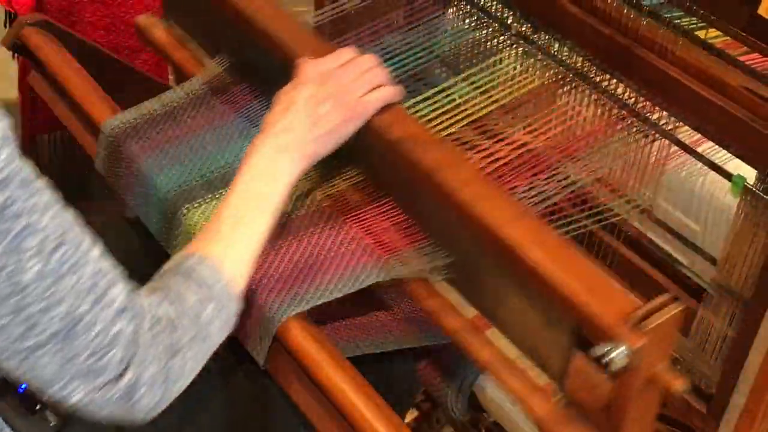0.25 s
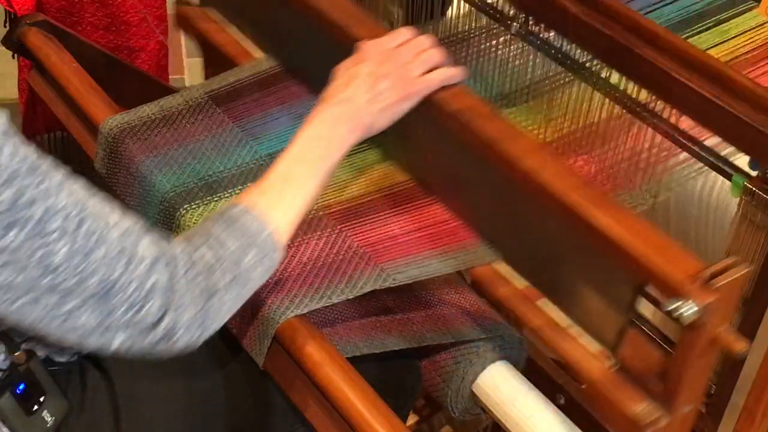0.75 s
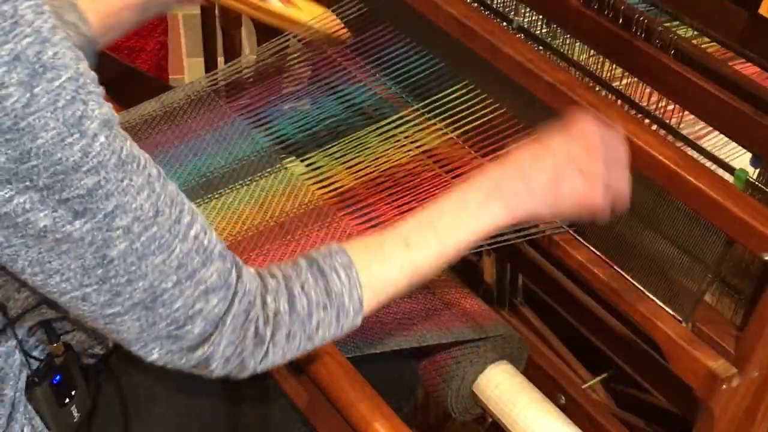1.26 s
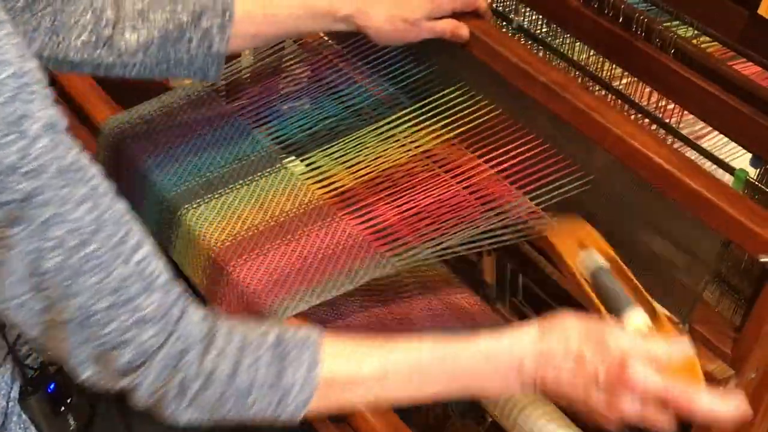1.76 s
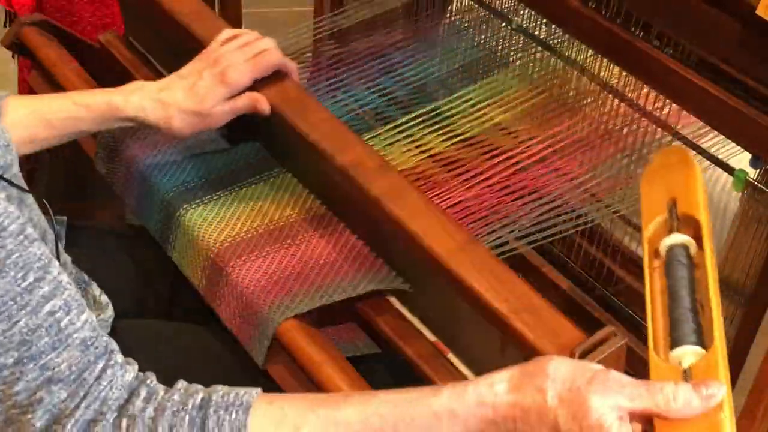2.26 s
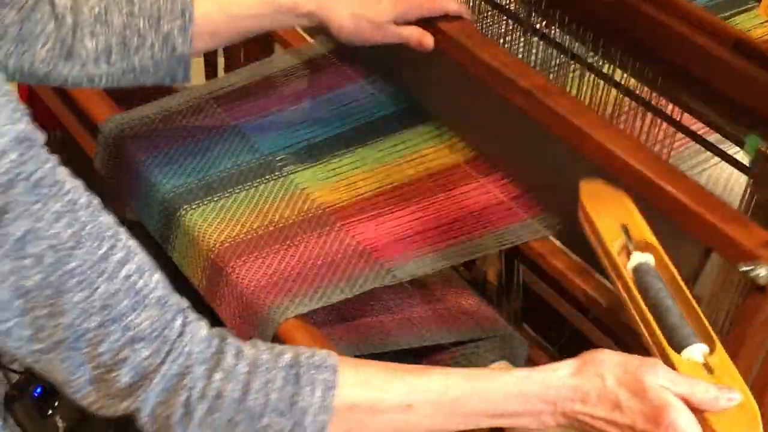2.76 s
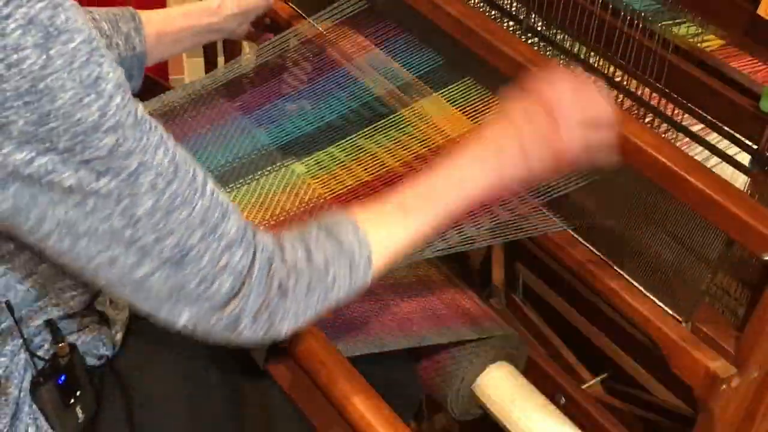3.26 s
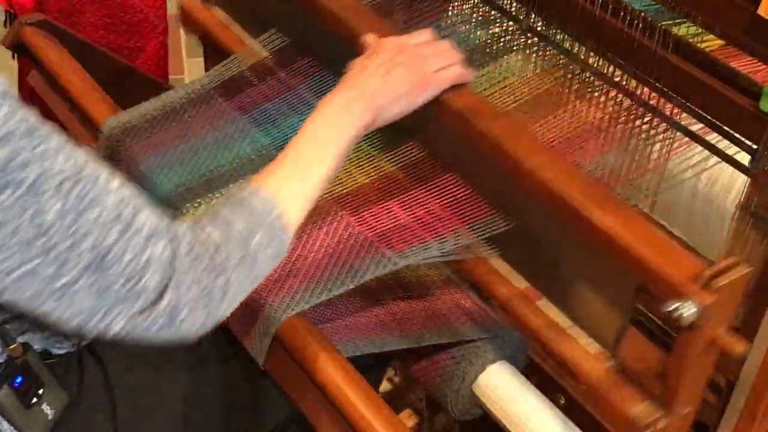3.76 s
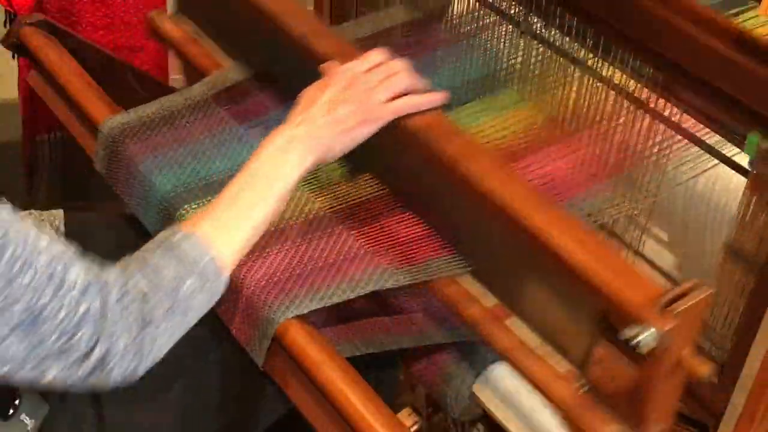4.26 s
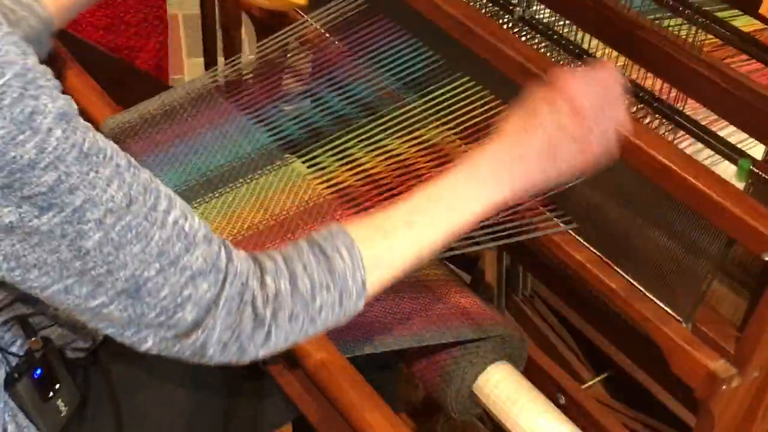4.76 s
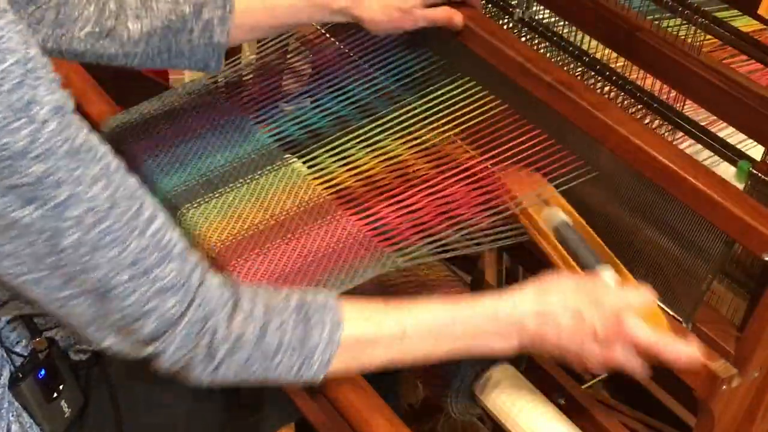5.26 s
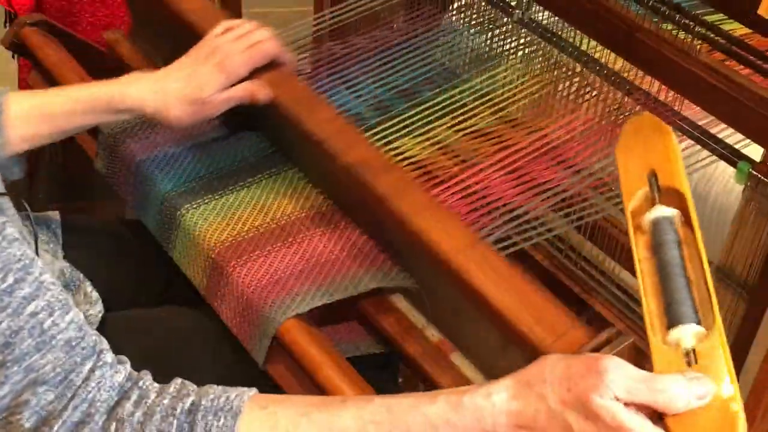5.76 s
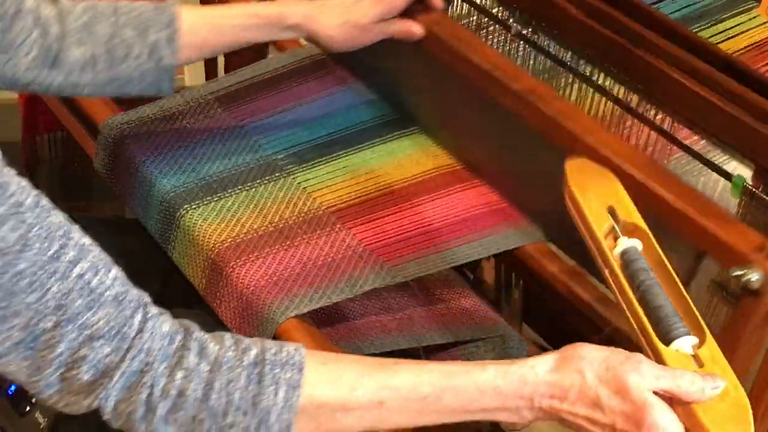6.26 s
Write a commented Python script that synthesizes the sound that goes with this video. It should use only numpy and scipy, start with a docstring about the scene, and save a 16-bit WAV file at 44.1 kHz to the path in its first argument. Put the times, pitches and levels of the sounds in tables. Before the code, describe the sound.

A wooden floor loom is worked by hand, heard from beside the weaver in a small room. It opens with a few bobbin clicks, then a loud clatter of metal heddles and a low thud at about 0.7 seconds, and wooden knocks at 1 and 1.3. The bobbin chatters in the thrown shuttle from 1.2 to 2 seconds, with a dull bump at 1.9. Faint creaks and another heddle clatter follow between 2.1 and 2.8, then a sharp knock at 2.9. The bobbin rattles again from 3.1 to 4.1, with a strong, close, dull bump at 3.4. Heddles clatter at 4.3, the beater knocks at 4.6, and the bobbin chatters from 4.8 to 5.4 and clicks near 5.9. Softer rattling, a knock and a low thud come around 6.4. Threads hiss softly through the reed, over a faint mains hum.

```python
"""A bobbin clicks and chatters on its spindle as a shuttle is thrown across a wooden floor loom.
The beater swings, creaks and knocks on the frame; at each change of shed the metal heddles clatter.
Low thuds sound now and then, warp threads hiss through the reed, and a few dull bumps come
close by. All is heard from beside the weaver, in a small room with a faint mains hum."""
import sys
import numpy as np
from scipy import signal
from scipy.fft import rfft, irfft, next_fast_len
from scipy.io import wavfile
from scipy.ndimage import uniform_filter1d

SR = 44100
rng = np.random.default_rng(int(sys.argv[2]) if len(sys.argv) > 2 else 0)


def store_pcm(level_fs):
    """Save levels as 16-bit WAV."""
    pcm = np.round(np.clip(level_fs, -1, 1) * 32767).astype(np.int16)
    wavfile.write(sys.argv[1], SR, np.atleast_2d(pcm).T)


N = 287576
STRIKE_S = 0.12  # buffer for one contact


def amp(db):
    """Decibels to gain."""
    return 10 ** (np.asarray(db) / 20)


def unit(x):
    """Scale to rms 1."""
    return x / np.sqrt(np.mean(x ** 2) + 1e-20)


def along(points, hz):
    """Interpolate (Hz, value) points on a log frequency axis."""
    point_hz, values = np.transpose(points)
    return np.interp(np.log(hz + 1), np.log(point_hz + 1), values)


def clock(length_s):
    """Sample times in seconds."""
    return np.arange(int(length_s * SR)) / SR


def add(track, time_s, sound):
    """Mix a sound into a track."""
    start = max(round(time_s * SR), 0)
    track[start:start + len(sound)] += sound[:max(N - start, 0)]


def filtered(x, gain):
    """Zero-phase filter with response gain(hz)."""
    size = next_fast_len(len(x) + 8192)
    return irfft(rfft(x, size) * gain(np.fft.rfftfreq(size, 1 / SR)), size)[:len(x)]


def shaped(x, spectrum):
    """Filter by (Hz, dB) points, then scale to rms 1."""
    return unit(filtered(x, lambda hz: amp(along(spectrum, hz))))


def causal(gain, size=2048):
    """Minimum-phase impulse response for gain(hz)."""
    magnitude = np.maximum(gain(np.fft.rfftfreq(size, 1 / SR)), 1e-6)
    cepstrum = irfft(np.log(magnitude))
    cepstrum[1:size // 2] *= 2
    cepstrum[size // 2 + 1:] = 0
    return irfft(np.exp(rfft(cepstrum)))


def convolved(x, response):
    """Convolution cut to the length of x."""
    return signal.fftconvolve(x, response)[:len(x)]


def gesture(t, rise_s, hold_s, sag_db_per_s, release_t60_s):
    """Envelope: attack, sagging hold, release."""
    release_db = 60 * np.maximum(t - hold_s, 0) / release_t60_s
    return (1 - np.exp(-t / rise_s)) * amp(-sag_db_per_s * t - release_db)


def ringing(modes, detune):
    """Damped modes; each blow lands elsewhere and rings them a little differently."""
    t = clock(STRIKE_S)
    out = np.zeros(len(t))
    for hz, db, t60_s in modes:
        strength, shift, polarity = rng.standard_normal(3)
        envelope = amp(db + 2 * strength - 60 * t / t60_s)
        out += np.sign(polarity) * envelope * np.sin(2 * np.pi * hz * (1 + detune * shift) * t)
    return out


def burst(t60_s):
    """Decaying noise: two hard surfaces chatter as they meet."""
    t = clock(STRIKE_S)
    return rng.standard_normal(len(t)) * amp(-60 * t / t60_s)


def impacts(size, rate_per_s, spread_db):
    """Tiny collisions of random time, sign and strength."""
    hits = rng.random(size) < rate_per_s / SR
    strength = np.clip(rng.standard_normal(size), -2, 2)
    return hits * rng.choice([-1, 1], size) * amp(spread_db * strength)


# room air: (frequency [Hz], relative density [dB])
AIR_SPECTRUM = [(20, -2), (60, 3.5), (120, 3.5), (300, -2.5), (700, -9.5), (2000, -4.5), (6000, -9.5),
                (16000, -14)]
def background(air_db=-63, hum_db=-72, mains_hz=60):
    """Still room air with a mains hum."""
    air = shaped(rng.standard_normal(N), AIR_SPECTRUM)
    hum = unit(np.sin(2 * np.pi * mains_hz * np.arange(N) / SR))
    return amp(air_db) * air + amp(hum_db) * hum


# room decay: (frequency [Hz], t60 [s])
ROOM_DECAY = [(150, 0.67), (1000, 0.49), (3000, 0.44), (8000, 0.33), (15000, 0.37)]
def room(x, build_s=0.0028, block=4096):
    """Reverberation, with a new tail per block as weaver and beater move."""
    out = np.zeros(N)
    for start in range(0, N, block):
        hz, t, noise = signal.stft(rng.standard_normal(SR // 2), SR, nperseg=256)
        fade = amp(-60 * t / along(ROOM_DECAY, hz)[:, None]) * (1 - np.exp(-t / build_s))
        tail = signal.istft(noise * fade, SR, nperseg=256)[1]
        add(out, start / SR, signal.fftconvolve(x[start:start + block], tail / np.linalg.norm(tail)))
    return out


# yarn hiss contour: (time [s], level [dB])
YARN_LEVELS = [(0.0, -58.5), (0.11, -57.5), (0.58, -56), (1.25, -58.5), (2.21, -52), (2.34, -56.5),
               (2.96, -47), (3.09, -57), (3.36, -62.5), (3.52, -60.5), (3.65, -59), (3.96, -57),
               (4.16, -53), (4.38, -54), (4.65, -55.5), (4.79, -54), (4.98, -55), (5.21, -72.5),
               (5.74, -57), (5.9, -55), (6.12, -56), (6.52, -48.5)]
# yarn hiss: (frequency [Hz], relative density [dB])
YARN_SPECTRUM = [(100, -11.5), (250, -7), (450, 0), (750, 4), (1100, -1), (1700, 0.5), (3300, -3.5),
                 (6700, -0.5), (10000, -11), (16000, -20)]
def yarn(trim_db=-1, pause_db=-6.5, pause_s=0.071, return_trim_db=-14, shed_db=-52):
    """Warp threads brush through the reed, swelling as the shed opens and the beater returns."""
    t = np.arange(N) / SR
    fibres = shaped(impacts(N, rate_per_s=4400, spread_db=1), YARN_SPECTRUM)
    # the hiss dips just before the beater moves or lands
    pauses = sum(np.exp(-((t - time_s + pause_s / 2) / pause_s) ** 2)
                 for pull_s, _, rest_s, _, _ in BEATER_SWINGS for time_s in (pull_s, rest_s))
    contour_db = np.interp(t, *np.transpose(YARN_LEVELS))
    rubbing = amp(trim_db + contour_db + pause_db * pauses)
    drag = gesture(clock(0.92), rise_s=0.082, hold_s=0.082, sag_db_per_s=0, release_t60_s=0.68)
    for _, _, rest_s, rest_db, _ in BEATER_SWINGS:
        add(rubbing, rest_s, amp(rest_db + return_trim_db) * drag)
    for _, _, land_s, _ in SHED_CHANGES:
        add(rubbing, land_s, amp(shed_db) * drag)
    return fibres * rubbing


# creaks: (time [s], length [s], start pitch [Hz], end pitch [Hz], level [dB], pitch jitter [ratio])
BEATER_CREAKS = [(2.153, 0.074, 693, 776, -59.5, 0), (2.457, 0.069, 721, 770, -54, 0),
                 (2.694, 0.069, 1430, 1504, -55, 0.04), (4.117, .095, 723, 915, -52, 0.02),
                 (6.043, 0.076, 734, 767, -54, 0.13)]
def beater_creaks():
    """A wooden pivot sticks and slips, singing briefly as it turns."""
    out = np.zeros(N)
    for time_s, length_s, start_hz, end_hz, db, jitter in BEATER_CREAKS:
        t = clock(length_s)
        slip, grip = unit(uniform_filter1d(rng.standard_normal((2, len(t))), size=120))
        pitch_hz = np.interp(t, [0, length_s], [start_hz, end_hz]) * (1 + jitter * slip)
        swell = np.sin(np.pi * t / length_s) * amp(3 * grip)
        tone = np.sin(2 * np.pi * np.cumsum(pitch_hz) / SR)
        add(out, time_s, amp(db) * unit(swell * tone))
    return out


# bumps: (time [s], peak [dB])
BUMP_HITS = [(1.879, -29), (2.035, -38), (3.357, -18.5)]
# bump modes: (frequency [Hz], relative level [dB], t60 [s])
BUMP_MODES = [(78.5, -5, 0.099), (175, 3, 0.018), (464, 17, 0.011), (825, 13, 0.0076), (1220, 13, 0.0047)]
def bumps(highpass_hz=70, rise_s=0.00011):
    """Soft, dull bumps close by: a few heavily damped modes."""
    out, t = np.zeros(N), clock(0.1)
    bump = sum(amp(db - 60 * t / t60_s) * np.sin(2 * np.pi * hz * t) for hz, db, t60_s in BUMP_MODES)
    bump *= 1 - np.exp(-t / rise_s)
    bump = signal.sosfilt(signal.butter(1, highpass_hz, "high", fs=SR, output="sos"), bump)
    for time_s, peak_db in BUMP_HITS:
        add(out, time_s, amp(peak_db) * bump / np.abs(bump).max())
    return out


# low thuds: (time [s], level [dB], t60 [s])
LOW_THUDS = [(.697, -41.5, 0.19), (1.024, -51, 0.18), (1.878, -48, 0.34), (2.17, -68, 0.34),
             (4.27, -57, 0.68), (4.661, -65, 0.26), (6.08, -54.5, 0.28), (6.43, -44.5, 0.44)]
# rumble: (frequency [Hz], relative density [dB])
RUMBLE_SPECTRUM = [(50, -30), (130, -7), (190, -5.5), (260, -4), (420, 6), (560, 3.5), (900, 6),
                   (2000, -40), (6000, -70)]
def low_thuds(rise_s=0.0047):
    """Low thuds and short rumbles of the loom and cloth being worked."""
    out, t = np.zeros(N), clock(0.4)
    for time_s, db, t60_s in LOW_THUDS:
        rumble = shaped(rng.standard_normal(len(t)), RUMBLE_SPECTRUM)
        envelope = (1 - np.exp(-t / rise_s)) * amp(db - 60 * t / t60_s)
        add(out, time_s, rumble * envelope)
    return out


# blows on the frame: (time [s], attack level [dB], tilt [dB/octave], t60 scale [ratio])
FRAME_KNOCKS = [(.146, -47, 0.5, 1), (.325, -40, 4.5, 1), (.633, -37.5, 6.5, 1), (1.016, -30.5, 1, 1),
                (1.323, -33, 5, 3), (1.434, -49, -2.5, 1), (2.918, -25.5, -1.5, .8),
                (2.936, -38.5, -2.5, 2.5), (3.946, -41, 4, 1.5), (4.356, -41, -5.5, 1.5),
                (4.545, -44.5, -1.5, 1.5), (4.642, -31, -0.5, 1.5), (6.048, -42, 1, 1),
                (6.377, -40.5, 3, 1)]
# frame modes: (frequency [Hz], relative level [dB], base t60 [s])
FRAME_MODES = [(441, -12.5, 0.049), (736, -12, 0.058), (924, -3, 0.015), (1185, -1, 0.024), (1611, 0, 0.03),
               (1747, 6.5, 0.014), (2187, 5, 0.016), (2620, 2, 0.015), (3360, -1.5, 0.061)]
def frame_knocks(attack_s=0.005):
    """Beater, treadles and shuttle strike the wooden frame, which rings on when left free."""
    out = np.zeros(N)
    wood_hz_db = [(250, -23.5), (600, -1.5), (950, 5.5), (2200, -1.5), (5000, -10.5), (14000, -33)]
    for time_s, db, tilt_db_per_oct, t60_scale in FRAME_KNOCKS:
        modes = [(hz, mode_db, t60_s * t60_scale) for hz, mode_db, t60_s in FRAME_MODES]
        blow = unit(ringing(modes, detune=0.012)) + 0.7 * unit(burst(t60_s=0.015))
        wood = causal(
            lambda hz: amp(along(wood_hz_db, hz) + tilt_db_per_oct * np.log2((hz + 100) / 1500)))
        knock = signal.fftconvolve(blow, wood)
        attack_rms = knock[:int(attack_s * SR)].std()
        add(out, time_s, amp(db) * knock / attack_rms)
    return out


# heddle rattle: (frequency [Hz], relative density [dB])
HEDDLE_SPECTRUM = [(60, -21), (150, -7.5), (280, -15), (450, -7), (800, 0), (1200, -2.5), (1900, 2),
                   (2700, 1), (3600, -3), (5200, 0), (7800, -2), (9000, -8), (11500, -12), (16000, -21)]
def rattle(db, rise_s, hold_s, tilt_db_per_oct):
    """Loose metal heddles collide while shaken, then settle; a harder shake makes more collisions."""
    def metal_gain(hz):
        octaves = np.log2(np.clip(hz, 600, 10000) / 2000)
        return amp(along(HEDDLE_SPECTRUM, hz) + tilt_db_per_oct * octaves)

    t = clock(0.4)
    group_rate_per_s = 400 * amp(0.7 * (db + 36))
    swarm = sum(convolved(impacts(len(t), group_rate_per_s, spread_db=1.5), burst(t60_s=0.004))
                for _ in range(4))
    envelope = gesture(t, rise_s, hold_s, sag_db_per_s=26.5, release_t60_s=0.097)
    return amp(db) * envelope * unit(convolved(swarm, causal(metal_gain)))


# beater swings: (pull time [s], level [dB], back-at-rest time [s], level [dB], rise at rest [s])
BEATER_SWINGS = [(.298, -42, 1.009, -32, .004), (2.137, -42, 2.818, -35, .012),
                 (3.907, -40.5, 4.633, -33.5, .009), (5.703, -41.5, 6.395, -35, .04)]
# shed changes: (start time [s], level [dB], end time [s], level [dB])
SHED_CHANGES = [(.653, -29.5, 0.69, -23), (2.407, -39, 2.47, -33), (4.243, -42.5, 4.357, -37),
                (6.074, -50, 6.228, -48)]
def heddles(jolt_rise_s=0.0061, travel_trim_db=-6):
    """Each pick shakes the heddles: the beater starts, the shed changes, the beater comes back."""
    out = np.zeros(N)
    for pull_s, pull_db, rest_s, rest_db, rise_s in BEATER_SWINGS:
        add(out, pull_s, rattle(pull_db, rise_s=0.019, hold_s=0.087, tilt_db_per_oct=0.5))
        add(out, rest_s, rattle(rest_db, rise_s, hold_s=rise_s + 0.075, tilt_db_per_oct=0.24))
    jolt = dict(rise_s=jolt_rise_s, hold_s=0.016, tilt_db_per_oct=1.6)
    for start_s, start_db, land_s, land_db in SHED_CHANGES:
        add(out, start_s, rattle(start_db, **jolt))
        travel = rattle(start_db + travel_trim_db, jolt_rise_s, land_s - start_s, tilt_db_per_oct=-0.1)
        add(out, start_s, travel)
        add(out, land_s, rattle(land_db, **jolt))
    return out


# tugs of the weft: (time [s], hold [s], relative level [dB])
BOBBIN_SPINS = [(0, 0.072, -46), (1.155, 0.11, -45), (1.633, 0.5, -47), (3.12, 0.17, -53),
                (3.313, 0.11, -45.5), (3.517, 0.41, -45.5), (4.802, 0.12, -42.5), (5.404, 0.15, -50),
                (5.88, 0.13, -53.5)]
# shuttle with bobbin: (frequency [Hz], relative level [dB], t60 [s])
SHUTTLE_MODES = [(1181, 1.5, 0.081), (1703, 14, 0.026), (2168, 9.5, 0.035), (2424, 11.5, 0.048),
                 (2604, 9.5, 0.035), (3055, 6.5, 0.011), (3410, 1, 0.035), (4057, 4, 0.058),
                 (4564, 3.5, 0.14), (4810, 5.5, 0.035), (5304, 6, 0.034), (6070, 3, 0.049),
                 (7350, -22, 0.019), (7994, 1, 0.041), (8140, 2, 0.04), (10650, -33, .015),
                 (12400, -13, 0.028)]
def bobbin_spin(trim_db=-2):
    """The unwinding bobbin chatters inside the shuttle and runs down after each tug."""
    taps = impacts(N, rate_per_s=120, spread_db=4.5)
    chatter = convolved(taps, ringing(SHUTTLE_MODES, detune=0.0044))
    chatter_hz_db = [(1000, -17), (2400, -2.5), (3500, -5), (8000, -16), (13000, -31)]
    spin = np.zeros(N)
    for time_s, hold_s, db in BOBBIN_SPINS:
        run_down = gesture(clock(1), rise_s=0.004, hold_s=hold_s, sag_db_per_s=41, release_t60_s=0.14)
        add(spin, time_s, amp(db + trim_db) * run_down)
    return shaped(chatter, chatter_hz_db) * spin


# spindle snaps: (time [s], relative level [dB])
SPINDLE_TICKS = [(.1281, -43.5), (1.4626, -36), (4.0357, -49), (5.8533, -38)]
# spindle modes: (frequency [Hz], relative level [dB], t60 [s])
SPINDLE_MODES = [(8150, 3.5, 0.023), (10400, -4.5, 0.0092), (12030, -1, 0.014), (14200, -14, 0.0066)]
def spindle_ticks(trim_db=-12):
    """The thin metal spindle snaps against its seat and rings briefly, very high."""
    out = np.zeros(N)
    for time_s, db in SPINDLE_TICKS:
        tick = convolved(ringing(SPINDLE_MODES, detune=0.004), burst(t60_s=0.0097))
        add(out, time_s, amp(db + trim_db) * unit(tick))
    return out


def with_bounces(strikes, bounces=2, mean_flight_s=0.02, first_loss_db=14, scatter_db=1.5):
    """Each bobbin strike, followed by weaker bounces at uneven intervals."""
    contacts = []
    for time_s, db, hull_db, hardness_db in strikes:
        contacts.append((time_s, db, hull_db, hardness_db))
        delays_s = np.cumsum(mean_flight_s * (0.5 + rng.random(bounces)))
        for k, delay_s in enumerate(delays_s):
            loss_db = first_loss_db * (1 + k / 2) + scatter_db * rng.standard_normal()
            contacts.append((time_s + delay_s, db - loss_db, hull_db, hardness_db))
    return contacts


# bobbin strikes: (time [s], relative level [dB], hull share [dB], contact hardness [dB])
BOBBIN_STRIKES = [(0.0466, -27, -14.5, 1.5), (0.0645, -34, -22, -11), (0.0813, -37.5, -18, -2),
                  (0.1287, -40, -1, 17), (1.156, -30.5, -7, 0), (1.321, -19.5, -6, -3),
                  (1.457, -37, -6, 10), (1.4626, -19.5, -35, 1), (1.473, -29, -28, -5), (1.496, -40, -6, 3),
                  (1.507, -31, -10, 4), (1.5844, -30.5, -16, 1.5), (1.618, -30, -20, 1),
                  (1.6517, -30.5, -2, -3.5), (1.663, -29.5, -14, -3.5), (1.882, -30.5, -2, 3.5),
                  (1.926, -31.5, -4, 3), (2.698, -35.5, 4, 18), (3.0803, -23.5, -6, -6),
                  (3.313, -31.5, -4, -10.5), (3.34, -29.5, -16, -6), (3.387, -41.5, -20, 5),
                  (3.4591, -31, -18, -1.5), (3.486, -33, -10, -22), (3.503, -21.5, -12, -6.5),
                  (3.508, -26, -30, -2), (3.5408, -20.5, -22, 2.5), (3.547, -25, -19, -12),
                  (3.5983, -30.5, -22, -6), (3.661, -36.5, -20, -8), (3.829, -44, -22, -9),
                  (4.015, -45, -2, 0), (4.0357, -27.5, -22, 1.5), (4.091, -26, -15, -2),
                  (4.095, -22.5, -16, -16), (4.132, -35, -1, 8), (4.778, -29, -4, -3),
                  (4.8178, -27, -5.5, -9), (4.848, -31, -8.5, -14), (4.865, -30.5, -9, -1.5),
                  (4.9147, -25.5, -7, -2), (5.0623, -22.5, -12.5, -9.5), (5.1003, -25, -20, 10),
                  (5.115, -33.5, -19, 1), (5.254, -42.5, 1.5, -6), (5.385, -37.5, -19, 6),
                  (5.399, -28.5, -5, 5.5), (5.8538, -25.5, -11, 4), (5.8748, -29.5, -30, -8)]
# bands of hull, hollow, spindle and spindle fizz: (low edge [Hz], high edge [Hz])
SHUTTLE_BANDS = [(950, 1500), (1850, 3100), (3200, 8600), (9000, 14500)]
def shuttle_clicks(trim_db=-18, crack_gain=0.86, rise_s=0.00032, damping_t60_cycles=330):
    """The bobbin strikes spindle and hull; a harder contact puts more force into the spindle."""
    out, t = np.zeros(N), clock(STRIKE_S)
    filters = [signal.butter(5, edges_hz, "band", fs=SR, output="sos") for edges_hz in SHUTTLE_BANDS]
    for time_s, db, hull_db, hardness_db in with_bounces(BOBBIN_STRIKES):
        fizz_db = -22.5 + 1.4 * hardness_db
        shares = amp([hull_db, 0, hardness_db, fizz_db])
        shares /= np.linalg.norm(shares)
        ring = unit(convolved(ringing(SHUTTLE_MODES, detune=0.02), burst(t60_s=0.019)))
        crack = crack_gain * unit(burst(t60_s=0.054))
        click = (ring + crack) * (1 - np.exp(-t / rise_s))
        for bandpass, (low_hz, _), share in zip(filters, SHUTTLE_BANDS, shares):
            damping = amp(-60 * t * low_hz / damping_t60_cycles)  # wood swallows the treble first
            band = unit(damping * signal.sosfilt(bandpass, click))
            add(out, time_s, amp(db + trim_db) * share * band)
    return out


def scene(shuttle_wet_db=-7, loom_wet_db=-3, cloth_treble_db=-3):
    """The shuttle is near and fairly dry; shafts and frame lie deeper in the room."""
    shuttle = shuttle_clicks() + spindle_ticks() + bobbin_spin()
    loom = heddles() + frame_knocks() + low_thuds() + beater_creaks()
    # cloth and warp soften what the shuttle sends into the room
    softened = filtered(shuttle, lambda hz: amp(along([(2600, 0), (11000, cloth_treble_db)], hz)))
    reverb = room(amp(shuttle_wet_db) * softened + amp(loom_wet_db) * loom)
    return (shuttle + loom + reverb + bumps() + yarn() + background())[None]


def record(dry, cutoff_hz=16050):
    """Brick-wall low-pass."""
    return np.array([filtered(channel, lambda hz: hz < cutoff_hz) for channel in dry])


dry = scene()
out = record(dry)
store_pcm(out)
```